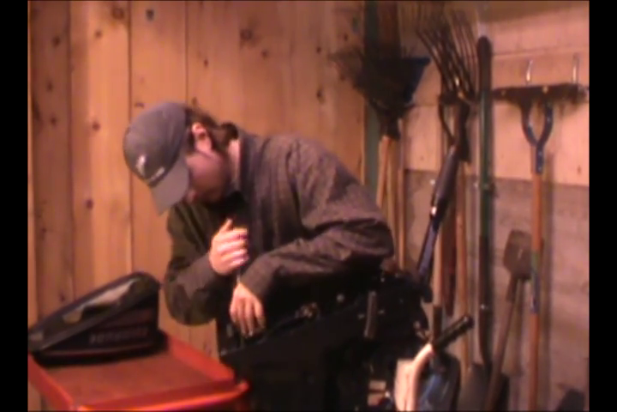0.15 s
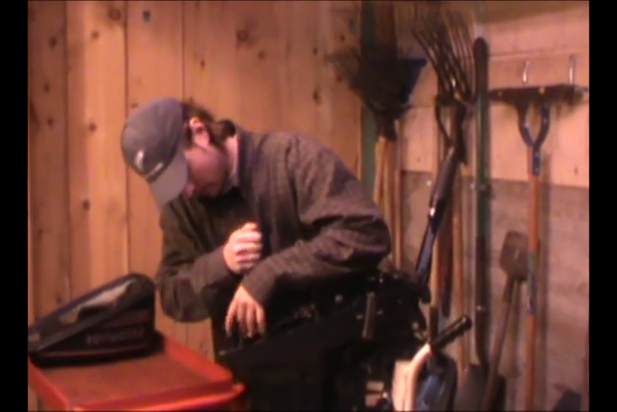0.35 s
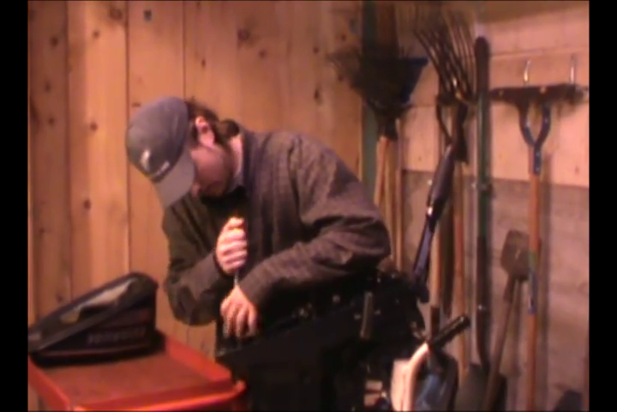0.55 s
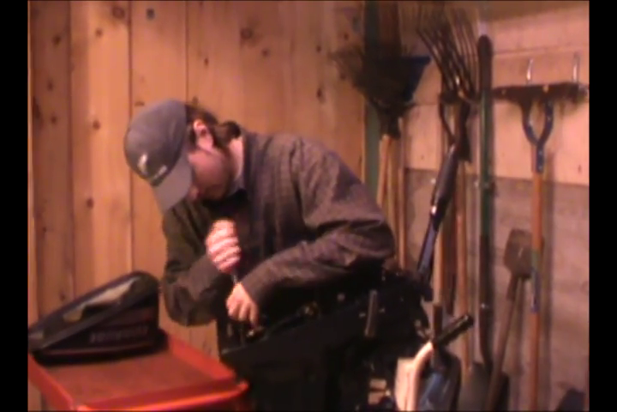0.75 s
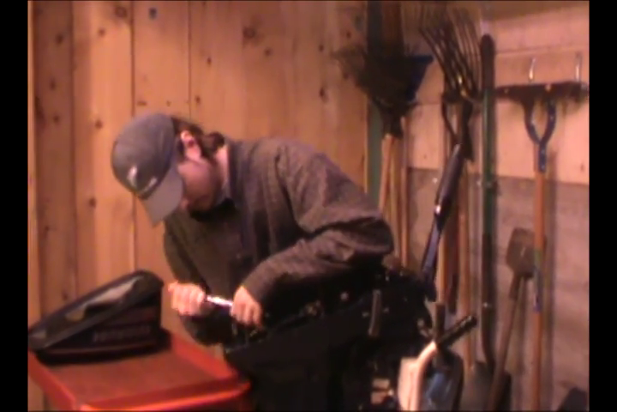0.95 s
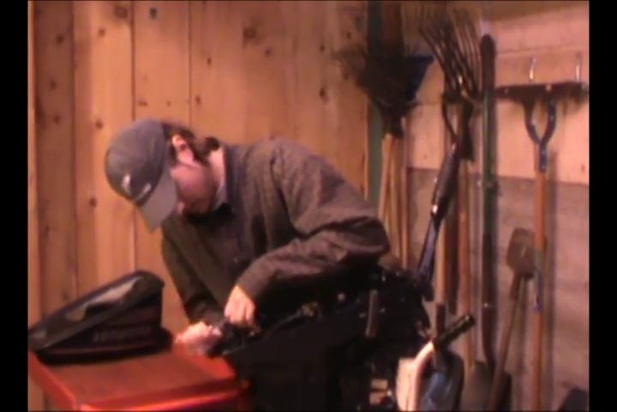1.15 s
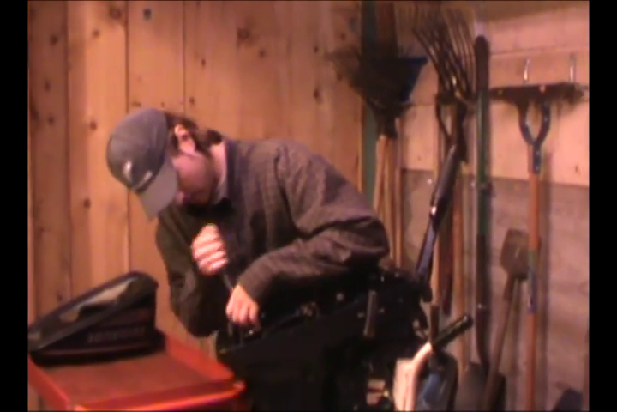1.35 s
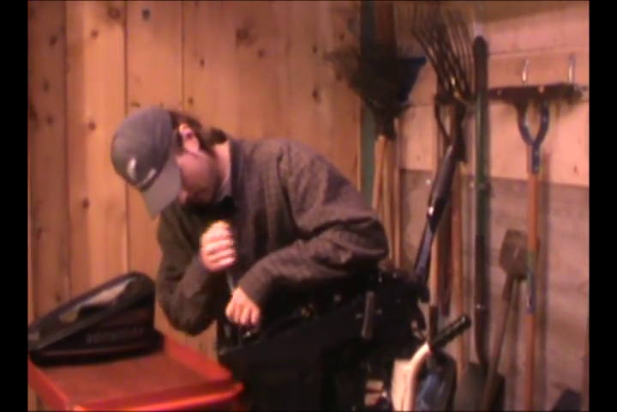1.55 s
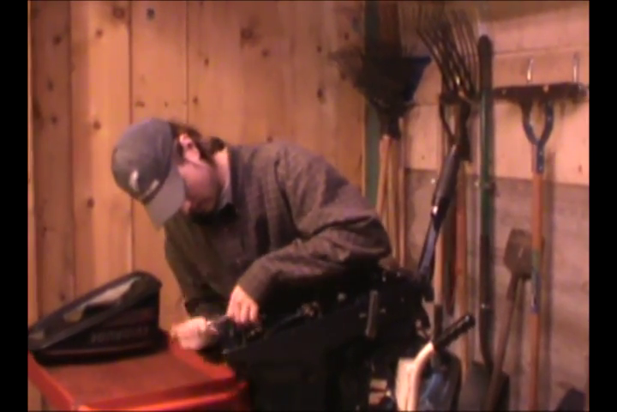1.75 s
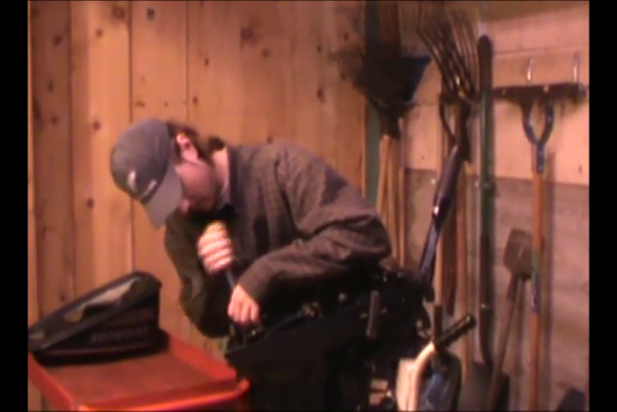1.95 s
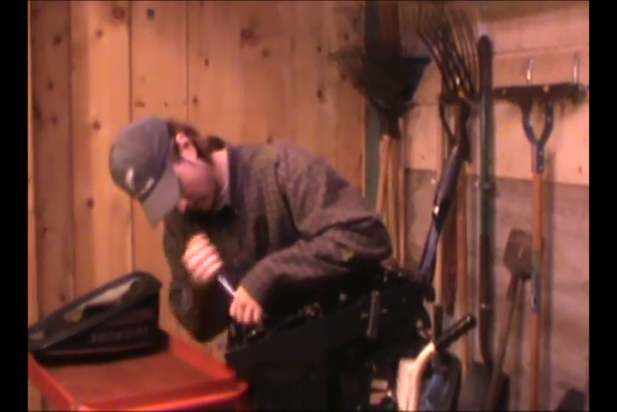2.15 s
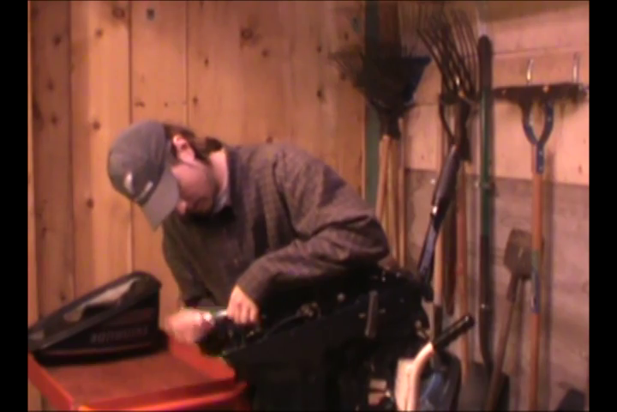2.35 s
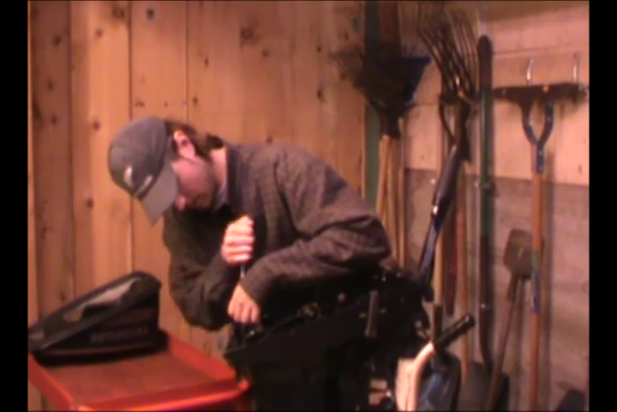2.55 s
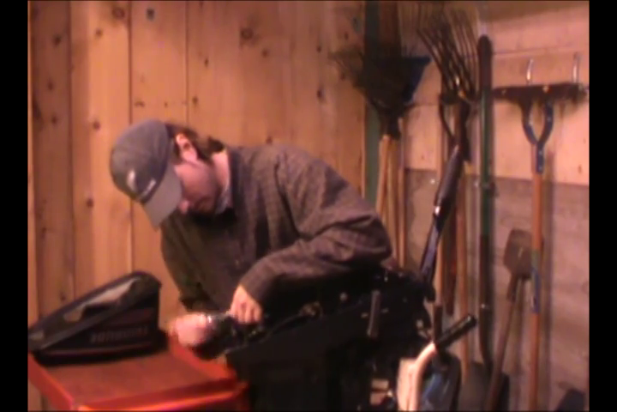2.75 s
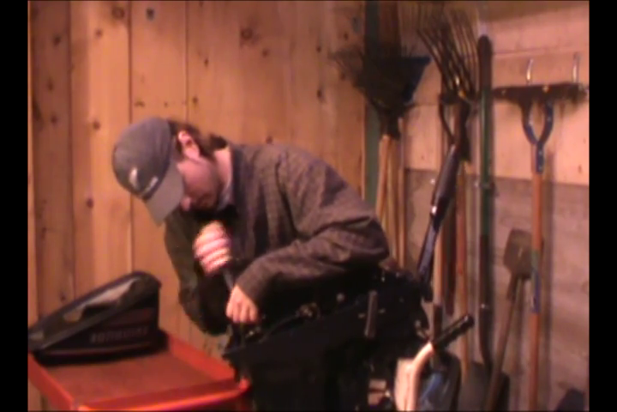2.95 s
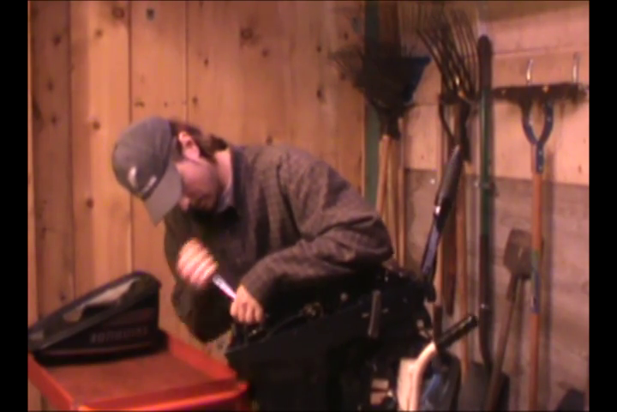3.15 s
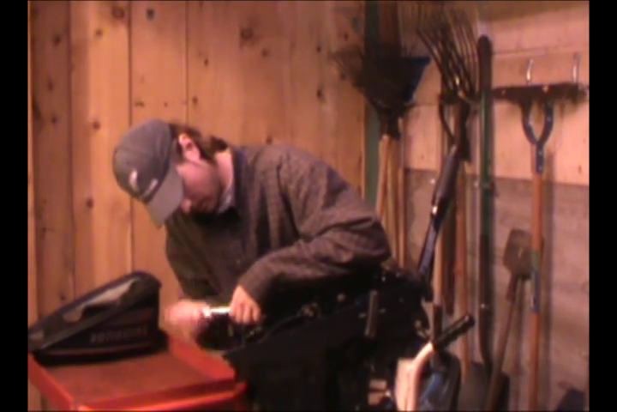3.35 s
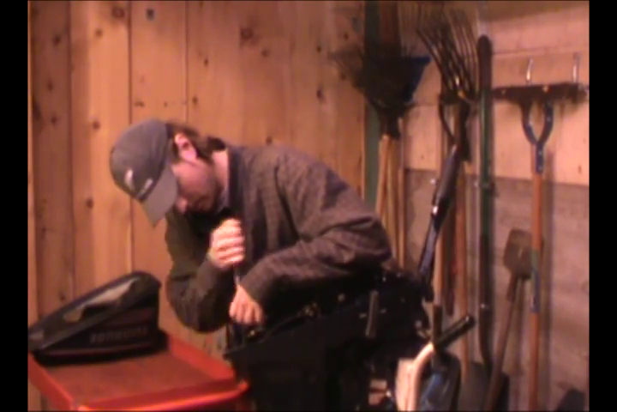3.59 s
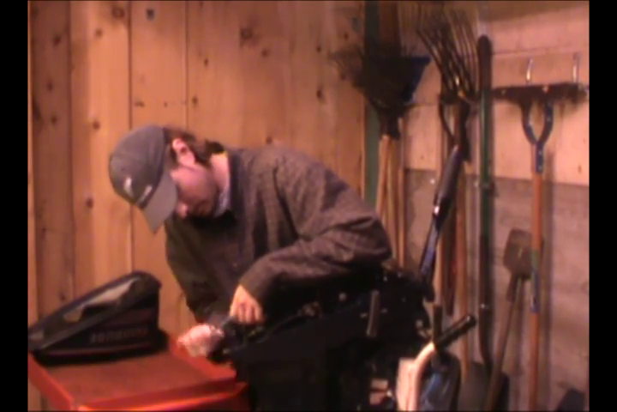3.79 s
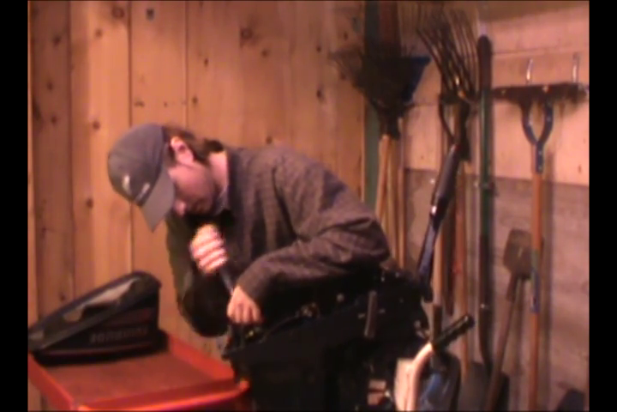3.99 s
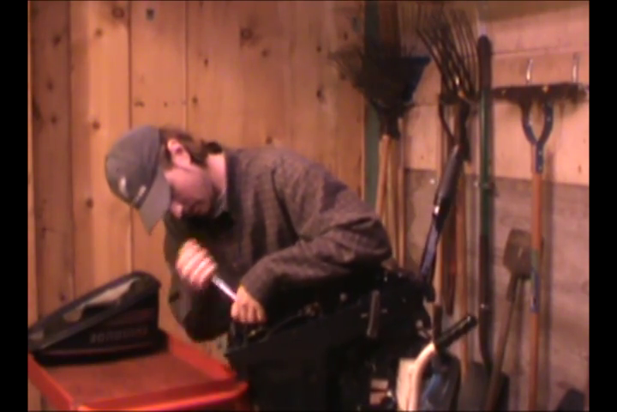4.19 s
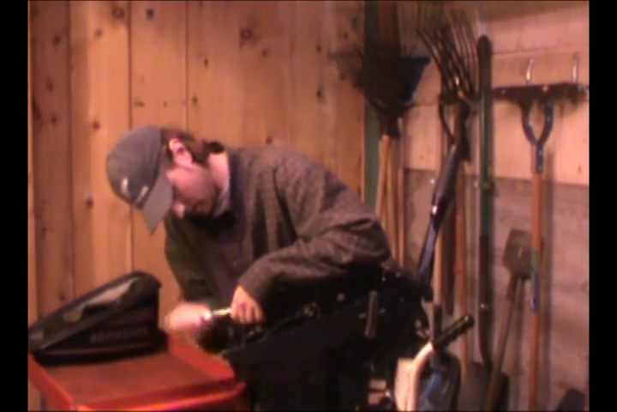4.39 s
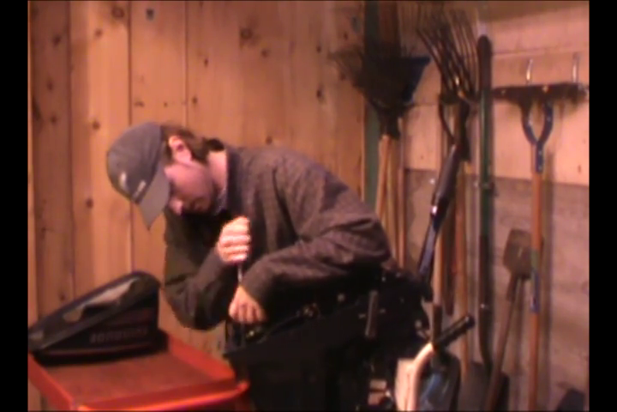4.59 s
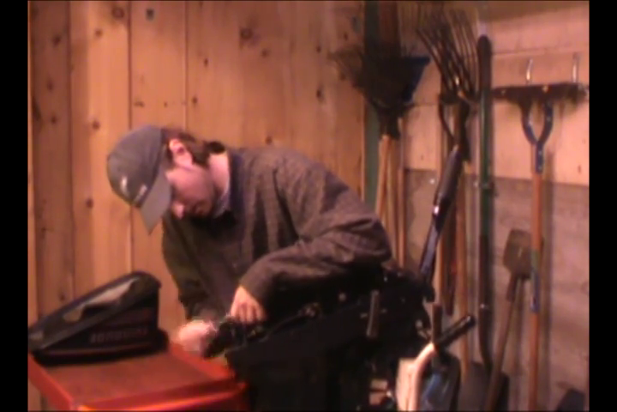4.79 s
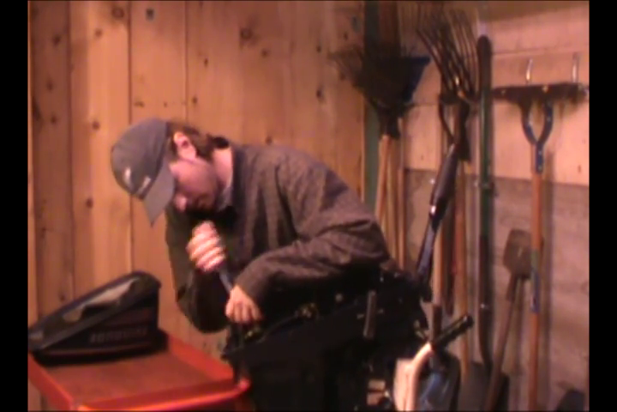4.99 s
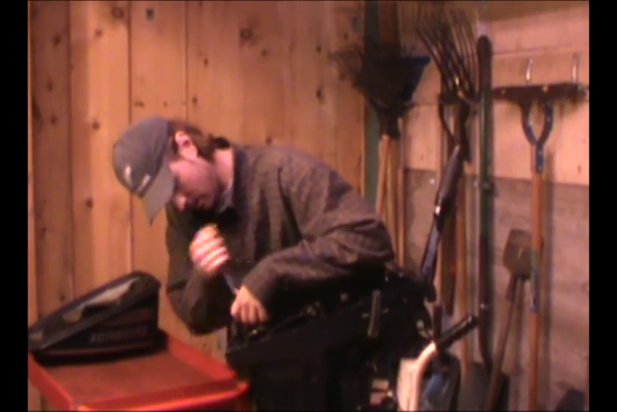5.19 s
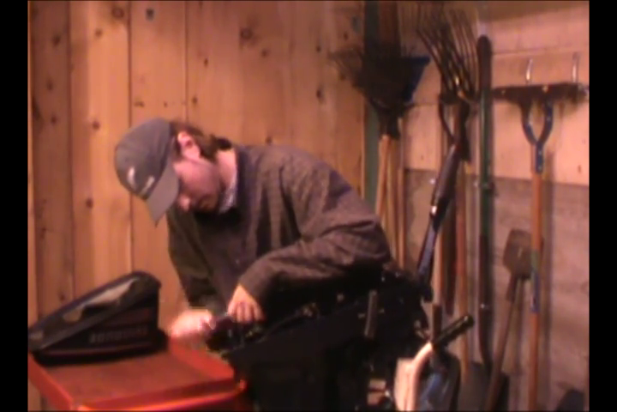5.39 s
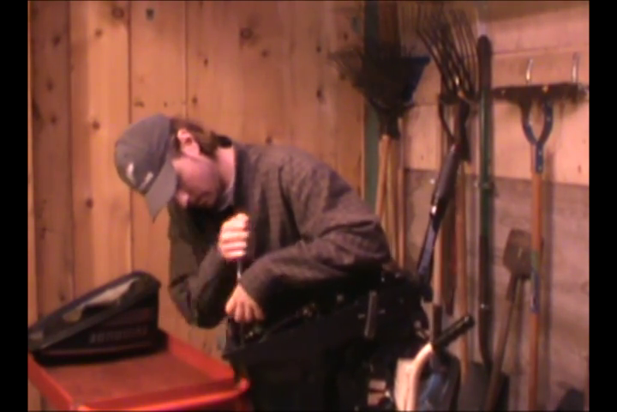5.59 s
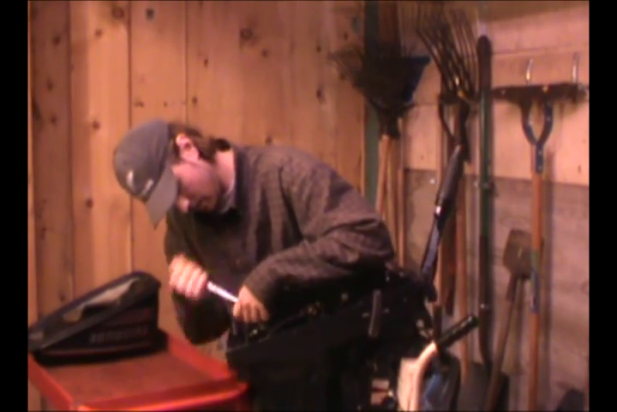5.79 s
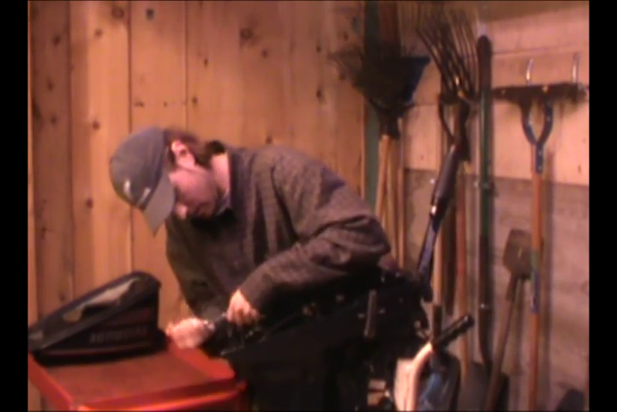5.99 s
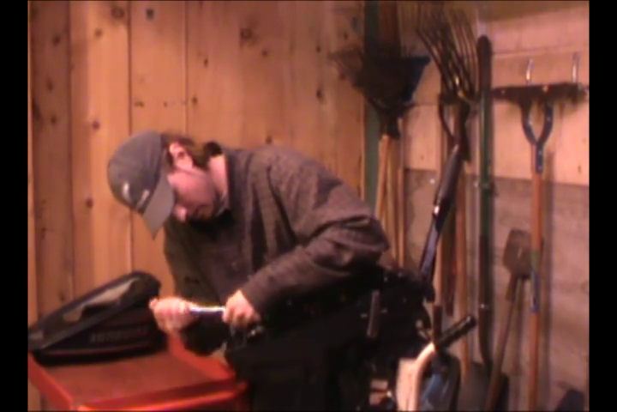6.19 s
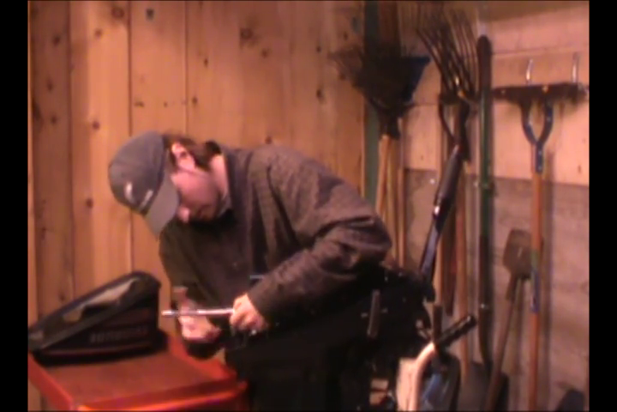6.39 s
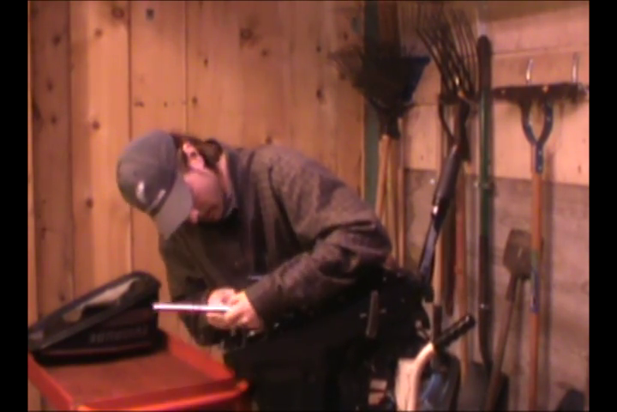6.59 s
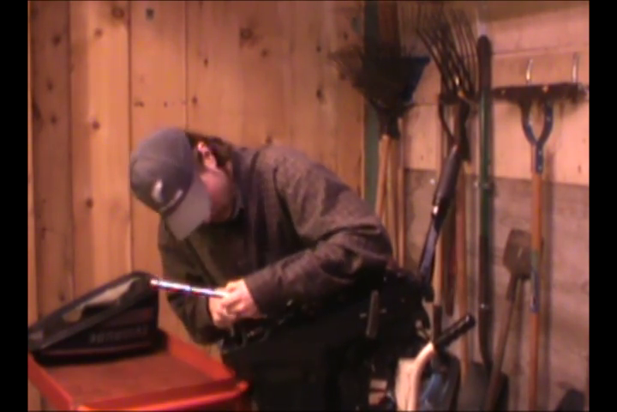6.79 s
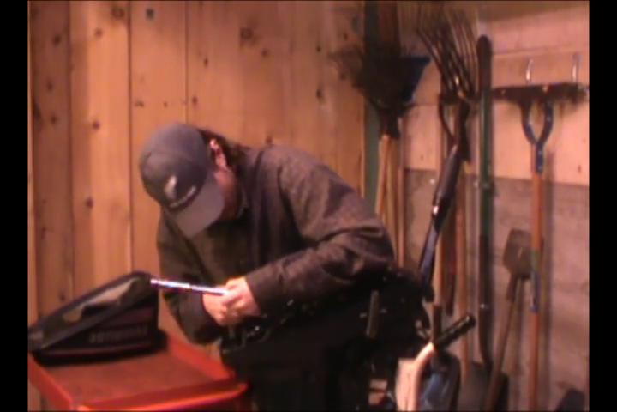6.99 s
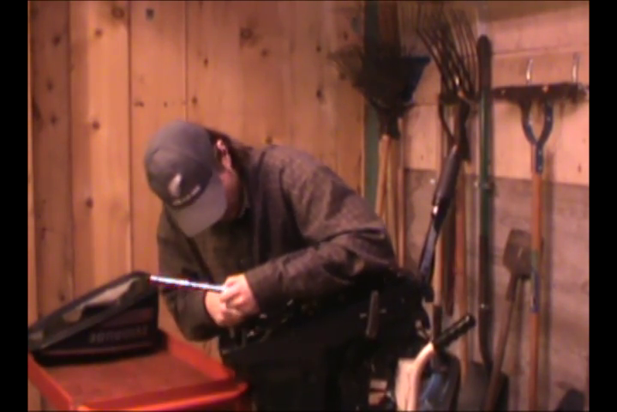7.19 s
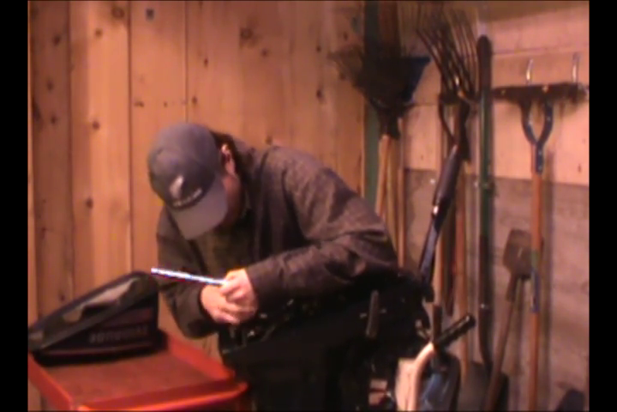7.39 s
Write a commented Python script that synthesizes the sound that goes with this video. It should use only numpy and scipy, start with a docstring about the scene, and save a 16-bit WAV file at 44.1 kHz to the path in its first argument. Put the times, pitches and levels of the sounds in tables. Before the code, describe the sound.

A hand ratchet works a spark plug loose in a small wooden shed, centred and about two metres away. A single click sounds at 0.4 seconds, followed by a few knocks on the engine, the strongest near 0.8. From 1.3 to 5.7 seconds come nine quick runs of bright, ringing steel clicks, roughly two a second, each lasting up to a fifth of a second, the later ones slightly hesitant. These are the loudest sounds. Between them the tool bumps, ticks and scrapes lightly, and a short creaking string of dry snaps comes around 3.7 to 3.9 seconds. From 6.1 to 6.6 seconds the socket gives a few small metal ticks, and one faint bump follows near 7. A sleeve rubs softly throughout, a little more in the middle. Close plank walls add a short echo over faint hum and hiss.

```python
"""In a wooden shed, about two metres away, a hand ratchet unscrews a spark plug from an engine.
On each of nine back-swings the pawl drops over a run of teeth and rings the steel head, handle and socket.
Between swings the tool knocks on the engine, a sleeve rubs and a few dry snaps sound.
Close plank walls add a short echo, and a faint hum and hiss lie underneath."""
import sys
import numpy as np
from scipy import signal
from scipy.fft import rfft, irfft, next_fast_len
from scipy.io import wavfile
from scipy.ndimage import uniform_filter1d

SR = 44100
rng = np.random.default_rng(int(sys.argv[2]) if len(sys.argv) > 2 else 0)


def inscribe(sig):
    """Save sig as 16-bit PCM at rate SR to the path in sys.argv[1].

    A 1-D sig is mono; a 2-D sig holds one channel per row.
    Samples are clipped to [-1, 1] before scaling.
    """
    pcm = np.round(np.clip(np.atleast_2d(sig).T, -1, 1) * 32767)
    wavfile.write(sys.argv[1], SR, pcm.astype(np.int16))


N = 328103
TIME = np.arange(N) / SR


def undb(db):
    """Decibels to gain."""
    return 10 ** (np.asarray(db) / 20)


def colour(x, curve):
    """EQ a sound with a curve of (f/Hz, gain/dB) points and bring it to rms 1."""
    size = next_fast_len(N, True)
    points_hz, points_db = np.transpose(curve)
    bins_hz = np.maximum(np.fft.rfftfreq(size, 1 / SR), 1)
    gain_db = np.interp(np.log(bins_hz), np.log(points_hz), points_db)
    y = irfft(rfft(x, size) * undb(gain_db), size)[..., :N]
    return y / y.std()


def highpass(x, hz):
    """Roll off the bass, 12 dB an octave."""
    return signal.sosfilt(signal.butter(2, hz, "high", fs=SR, output="sos"), x)


def unit(x):
    """Scale a hit to the energy of 5 ms at full level."""
    return x / np.sqrt(np.sum(x ** 2) / (.005 * SR))


def fade(t60_s, size=8192):
    """An exponential decay, 60 dB down after t60_s."""
    return np.exp(-np.log(1000) * TIME[:size] / t60_s)


def add(track, s, x):
    """Mix a sound in at s seconds."""
    i = int(s * SR)
    track[i:i + len(x)] += x[:N - i]


def drift(rate_hz):
    """Smooth random modulation with a spread of 1."""
    hold = int(SR / rate_hz)
    steps = np.repeat(rng.standard_normal(N // hold + 1), hold)
    y = uniform_filter1d(uniform_filter1d(steps, hold), hold)[:N]
    return y / y.std()


def ring(modes, detune, scatter_db, size=8192):
    """Struck modes; each hit lands a little differently and shifts their pitch and strength."""
    out = np.zeros(size)
    for hz, db, t60_s in modes:
        sharp, strong, polarity = rng.standard_normal(3)
        tone = np.sign(polarity) * np.sin(2 * np.pi * hz * (1 + detune * sharp) * TIME[:size])
        out += undb(db + scatter_db * strong) * unit(fade(t60_s, size) * tone)
    return out


def burst(hz, octaves, t60_s, size=8192):
    """A short rough contact: a decaying band of noise."""
    edges_hz = np.clip([hz / 2 ** (octaves / 2), hz * 2 ** (octaves / 2)], 20, .45 * SR)
    band = signal.butter(3, edges_hz, "band", fs=SR, output="sos")
    return unit(signal.sosfilt(band, rng.standard_normal(size) * fade(t60_s, size)))


def room_tone(air_db=-59.5, side_db=-4, waver_db=3):
    """A wavering hum and faint hiss, with the bass in the centre."""
    # spectrum of still air and hiss: f/Hz, level/dB
    air_eq = [(15, -53), (25, -6.5), (40, -22), (64, -8.5), (130, -13.5), (166, -17.5), (200, -14),
              (242, -18), (1100, -19.5), (1790, -21.5), (2410, -23), (2690, -23), (13600, -36),
              (16000, -28)]
    # tones of the hum: f/Hz, level/dB
    hum_tones = [(59.3, -69.5), (78, -68.5), (119, -73)]
    mid = colour(rng.standard_normal(N), air_eq)
    side = highpass(colour(rng.standard_normal(N), air_eq), hz=151)
    hum = np.zeros(N)
    for hz, db in hum_tones:
        peak = np.sqrt(2) * undb(db + waver_db * drift(rate_hz=4.02))
        hum += peak * np.sin(2 * np.pi * hz * TIME + .34 * drift(rate_hz=5.8))
    return hum + undb(air_db) * (mid + undb(side_db) * np.array([side, -side]))


def sleeve(rub_db=2, side_db=-12):
    """Cloth catches and slips in small soft grains as the arm works."""
    # envelope of the rubbing: t/s, level/dB
    envelope = [(0.0, -57), (0.46, -57), (0.66, -59), (1.3, -58.5), (1.49, -61.5), (1.7, -58),
                (3.32, -52.5), (3.46, -51.5), (4.02, -53.5), (5.53, -53), (5.95, -57.5), (6.34, -56),
                (6.82, -61.5), (7.44, -63)]
    # spectrum of the cloth: f/Hz, level/dB
    cloth_eq = [(60, -41), (150, -5), (350, 1), (550, 1.5), (900, -2), (1700, -7), (3500, -15), (8000, -9),
                (15000, -19)]
    level_db = np.interp(TIME, *np.transpose(envelope))
    grain_db = 1.8 * drift(rate_hz=300) + 1.1 * drift(rate_hz=20)
    mid, side = colour(rng.standard_normal((2, N)) * undb(grain_db), cloth_eq)
    return (mid + undb(side_db) * np.array([side, -side])) * undb(level_db + rub_db)


def engine(contact_t60_s):
    """A rough push rings the engine's body."""
    # midrange modes of the engine and its cover: f/Hz, level/dB, t60/s
    body_modes = [(506.5, -1.5, 0.17), (582, -7.5, 0.013), (689, -0.5, 0.072), (864, -5.5, 0.0069),
                  (1500, -10.5, 0.0082)]
    push = rng.standard_normal(2048) * fade(contact_t60_s / 2, size=2048)
    return unit(signal.fftconvolve(push, ring(body_modes, detune=.04, scatter_db=2)))


def knocks(thud_db=4, body_db=4, clack_db=1, tick_db=1, tick_body_db=-11,
           nudges=14, nudge_db=-54, work_s=(1.5, 5.5)):
    """Bumps, ticks and nudges ring the engine; the contact itself clacks, or scrapes when it lasts."""
    # tool and hand bump the engine: t/s, thud/dB, body/dB, clack/dB, clack f/Hz, contact t60/s
    bumps = [(0.192, -59, -50.5, -61, 1800, .036), (0.522, -49, -46.5, -49.5, 2260, 0.015),
             (0.817, -40.5, -42, -38.5, 2600, 0.018), (0.838, -51, -51, -48, 2300, 0.034),
             (0.925, -60, -58, -43.5, 2570, .05), (1.565, -62, -52, -55, 5000, .03),
             (2.177, -63, -53, -57, 2200, .03), (2.362, -76, -50, -50, 1580, 0.043),
             (2.42, -61, -46.5, -43, 2880, 0.073), (2.9, -68, -49.5, -52.5, 2200, 0.043),
             (3.349, -57, -49.5, -48.5, 1380, 0.019), (4.213, -79, -46.5, -65, 1500, 0.025),
             (4.326, -58, -52.5, -78, 3000, 0.036), (4.846, -60, -49.5, -45.5, 2600, 0.026),
             (5.358, -55.5, -52, -44, 1680, 0.14), (7.055, -73, -60.5, -80, 1900, .022)]
    # low modes of the engine and its cover: f/Hz, level/dB, t60/s
    thud_modes = [(258, 0, .09), (290, -4, .06), (335, -2, .05)]
    # the socket ticks on the plug as it takes load or is pulled off: t/s, level/dB, f/Hz, contact t60/s
    ticks = [(0.553, -53, 6000, 0.026), (2.648, -39, 5260, 0.034), (3.21, -46.5, 4420, 0.039),
             (4.379, -45.5, 5100, .011), (4.877, -43, 4400, 0.035), (5.244, -41.5, 4020, 0.014),
             (6.137, -47, 4600, .055), (6.164, -39.5, 5700, .099), (6.242, -42, 5300, 0.047),
             (6.328, -45.5, 4400, 0.036), (6.617, -52, 3560, .019)]
    out = np.zeros(N)
    for s, low_db, mid_db, top_db, hz, t60_s in bumps:
        add(out, s, undb(low_db + thud_db) * unit(ring(thud_modes, detune=.02, scatter_db=1.5)))
        add(out, s, undb(mid_db + body_db) * engine(t60_s))
        add(out, s, undb(top_db + clack_db) * burst(hz, octaves=2.25, t60_s=t60_s))
    for s, db, hz, t60_s in ticks:
        add(out, s, undb(db + tick_db) * burst(hz, octaves=1.8, t60_s=t60_s))
        add(out, s, undb(db + tick_body_db) * engine(t60_s))
    for k in range(nudges):  # faint random touches while the arm works
        s = np.interp(k + rng.random(), (0, nudges), work_s)
        add(out, s, undb(nudge_db + 1.5 * rng.standard_normal()) * engine(contact_t60_s=.04))
    return highpass(out, hz=210)  # the small cover radiates no deep bass


def teeth(force_scatter_db=.63, ring_scatter_db=1.57, weaken_db=1.5,
          lift_s=.005, lift_db=-22.5, settle_s=.019, settle_db=-11):
    """The hand eases over evenly spaced teeth. Yields t/s and (crack, rattle, handle, socket, head)/dB."""
    # runs of the pawl; where the hand hesitates, a back-swing breaks into shorter runs:
    # t/s, length/s, teeth, slowing (-1..1), ease (0..1), crack/dB, engine rattle/dB, handle/dB,
    # socket/dB on the first tooth and on the last, head/dB on the first tooth and on the last
    runs = [(0.4005, 0, 1, 0, 0, -29, -57, -38.5, -39, -39, -32.5, -32),
            (1.293, .191, 11, .05, .15, -26.5, -46, -31.5, -24, -26, -25, -23.5),
            (1.926, .132, 9, .25, .41, -26, -49, -36.5, -35, -33, -16, -33.5),
            (2.443, .137, 9, .35, .23, -26, -47, -39.5, -26, -21.5, -50, -34.5),
            (2.933, 0, 1, 0, 0, -23.5, -42, -40, -35, -38, -30.5, -29),
            (2.963, .1035, 9, .13, .33, -24.5, -46.5, -42, -37, -41, -24.5, -27.5),
            (3.144, 0, 1, 0, 0, -34, -42.5, -43, -46, -43, -32, -36),
            (3.423, .039, 3, -0.14, 0, -29, -50, -37.5, -26.5, -35, -17, -23.5),
            (3.484, .0894, 7, .34, .35, -24.5, -44.5, -29, -25.5, -21, -17, -35),
            (3.956, .019, 2, 0, 0, -23, -38, -30.5, -24.5, -23, -35, -37),
            (4.003, .080, 7, -.2, 0, -25, -50, -30, -18.5, -32.5, -30, -22),
            (4.125, 0, 1, 0, 0, -25.5, -53.5, -34, -36, -37, -28.5, -26),
            (4.465, .015, 2, 0, 0, -22.5, -41, -31.5, -30.5, -37, -25, -33),
            (4.524, .0844, 7, .17, .29, -23.5, -44, -36.5, -38, -25, -42, -36),
            (4.969, .153, 12, -.15, .39, -23.5, -42, -35.5, -23.5, -41, -22, -37),
            (5.483, .025, 2, 0, 0, -24, -46, -32.5, -52, -27, -21, -23.5),
            (5.567, .0886, 6, .23, .52, -23, -45.5, -27.5, -24.5, -25, -20.5, -24)]
    for start_s, length_s, count, slowing, ease, *levels_db in runs:
        *hit_db, socket_from, socket_to, head_from, head_to = levels_db
        first_db = np.array([*hit_db, socket_from, head_from])
        last_db = np.array([*hit_db, socket_to, head_to])
        if count > 1:  # the pawl ticks as it lifts out of its seat
            yield start_s - lift_s, first_db + lift_db
        for turned in np.linspace(0, 1, count):
            lag = turned * (1 - turned) * (ease * (1 - 2 * turned) - slowing)
            force, seat, tilt = rng.standard_normal(3)
            force_db = force_scatter_db * force + weaken_db * (.5 - turned)
            offsets_db = [force_db, force_db, force_db, ring_scatter_db * seat, ring_scatter_db * tilt]
            yield start_s + length_s * (turned + lag), first_db + (last_db - first_db) * turned + offsets_db
        if count > 2:  # the loose tool rattles once more
            yield start_s + length_s + settle_s, last_db + settle_db


def pawl(t60_s=.011, rise_s=.00033, bounce_s=.001403, bounce_db=-2.5, landings=4, size=1024):
    """The pawl scrapes off a tooth, lands and bounces a few times within milliseconds."""
    touch = fade(t60_s, size) * (1 - np.exp(-TIME[:size] / rise_s))
    power, delay = np.zeros(size), 0
    for k, spread in enumerate(rng.uniform(.5, 1.5, landings)):
        landing = undb(bounce_db * k) * np.pad(touch, (delay, 0))[:size]
        power += landing ** 2
        delay += int(spread * bounce_s * SR * (k + 1))
    return np.sqrt(power) * rng.standard_normal(size)


def ratchet(handle_db=-3, wheel_db=-8, socket_db=.5, head_db=2, chink_db=-2):
    """Each tooth cracks, rattles the engine and rings the handle, toothed wheel, socket and head."""
    # modes of the four steel parts: f/Hz, level/dB, t60/s
    handle = [(3880, -6, 0.03), (4110, -5.5, 0.0099)]
    wheel = [(11280, 0, .014), (14750, -6, .012), (15450, 1, .008)]
    socket = [(6994, 0.29, 0.022), (7156, -1.3, 0.02)]
    head = [(9734, 8.5, 0.017), (9930, 5.5, 0.011), (9970, -9.5, 0.087)]
    # spectrum of the steel-on-steel crack: f/Hz, level/dB
    crack_eq = [(100, -48), (1800, -31), (2700, -18.5), (3700, -8), (5000, -9), (6600, 0.5), (8500, 6),
                (10300, 2), (11500, -2.5), (12500, -49), (15600, -27)]
    # spectrum of the rattle that the socket carries into the engine: f/Hz, level/dB
    rattle_eq = [(100, -33), (400, -12.5), (660, 3), (900, -12.5), (1500, -5), (2600, -10.5), (4000, -28),
                 (8000, -45)]
    # the socket shifts on the plug and chinks: t/s, level/dB, f/Hz
    chinks = [(4.8454, -27, 7250), (6.166, -44, 11000)]
    cracks, rattles, rings = np.zeros((3, N))
    for s, (crack_db, rattle_db, on_handle_db, on_socket_db, on_head_db) in teeth():
        force = pawl()
        add(cracks, s, undb(crack_db) * unit(force))
        add(rattles, s, undb(rattle_db) * unit(force))
        for modes, db in ((handle, on_handle_db + handle_db), (wheel, crack_db + wheel_db),
                          (socket, on_socket_db + socket_db), (head, on_head_db + head_db)):
            steel = ring(modes, detune=.007, scatter_db=2, size=2048)
            add(rings, s, undb(db) * unit(signal.fftconvolve(force, steel)))
    for s, db, hz in chinks:
        add(rings, s, undb(db + chink_db) * burst(hz, octaves=.26, t60_s=.0058))
    return rings + cracks.std() * colour(cracks, crack_eq) + rattles.std() * colour(rattles, rattle_eq)


def snaps(snap_db=-2, weight_db=-11, weight_hz=1200):
    """A short creaking string of dry snaps, each with a little weight below it."""
    # the snaps: t/s, level/dB, f/Hz
    hits = [(3.684, -30, 4100), (3.7517, -35, 4700), (3.793, -34, 3900), (3.807, -39, 4500),
            (3.8155, -39, 3900), (3.8302, -36, 3300), (3.8353, -33, 3600), (3.843, -34, 3500),
            (3.849, -31, 4000)]
    out = np.zeros(N)
    for s, db, hz in hits:
        add(out, s, undb(db + snap_db) * burst(hz, octaves=1.14, t60_s=.0021))
        add(out, s, undb(db + weight_db) * burst(weight_hz, octaves=2.4, t60_s=.0058))
    return out


def walls(predelay_s=.00101, build_s=.002, lumpy_db=3, size=16384):
    """Close plank walls return a dense echo, mostly alike in both ears, that lingers in the mids."""
    # bands of the shed's echo: f/Hz, t60/s, side level/dB
    bands = [(198, 0.14, -30.5), (682, 0.36, -12.5), (2000, 0.52, -12), (4020, 0.36, -12),
             (7660, 0.23, -17), (14000, 0.15, -2)]
    log_bins = np.log(np.fft.rfftfreq(size, 1 / SR) + 1)
    log_centres = np.log([band[0] for band in bands])
    noise = rng.standard_normal((2, size))
    lumps_db = lumpy_db * np.repeat(rng.standard_normal(size // 20 + 1), 20)[:size]
    spectra = rfft(noise * undb(lumps_db))
    echo = np.zeros((2, size))
    for k, (_, t60_s, side_db) in enumerate(bands):
        share = np.interp(log_bins, log_centres, np.arange(len(bands)) == k)
        mid, side = irfft(spectra * share, size) * fade(t60_s, size)
        echo += mid + undb(side_db) * np.array([side, -side])
    echo *= 1 - np.exp(-np.maximum(TIME[:size] - predelay_s, 0) / build_s)
    return echo / np.sqrt(np.sum(echo ** 2) / 2)


def shed(send, echo_db=-1, patterns=16):
    """Arm and tool keep moving, so the pattern of the echo changes from moment to moment."""
    out, step = np.zeros((2, N)), N // patterns + 1
    for start in range(0, N, step):
        for ear, echo in zip(out, walls()):
            add(ear, start / SR, signal.fftconvolve(send[start:start + step], echo))
    return undb(echo_db) * out


def scene():
    """The work sits dead centre; the knocks arrive largely by the walls, the snaps mostly dry."""
    tool, bumps, creak = ratchet(), knocks(), snaps()
    direct = highpass(tool, hz=800) + undb(2.5) * bumps + undb(.5) * creak
    send = tool + undb(5.5) * bumps + undb(-5) * creak
    return direct + shed(send) + sleeve() + room_tone()


def record(dry, top_hz=15900):
    """A steep low-pass takes off the very top of the treble."""
    return signal.sosfilt(signal.ellip(10, .2, 70, top_hz, fs=SR, output="sos"), dry)


dry = scene()
out = record(dry)
inscribe(out)
```